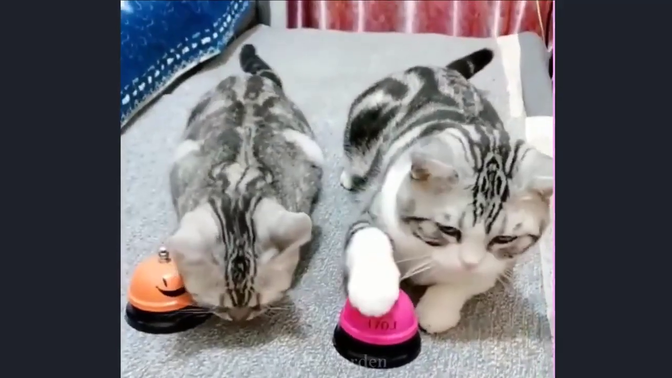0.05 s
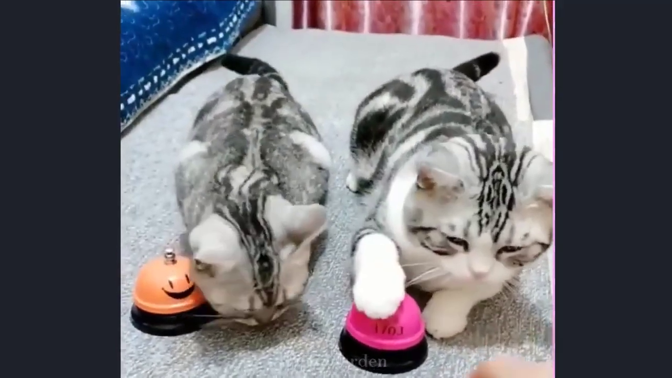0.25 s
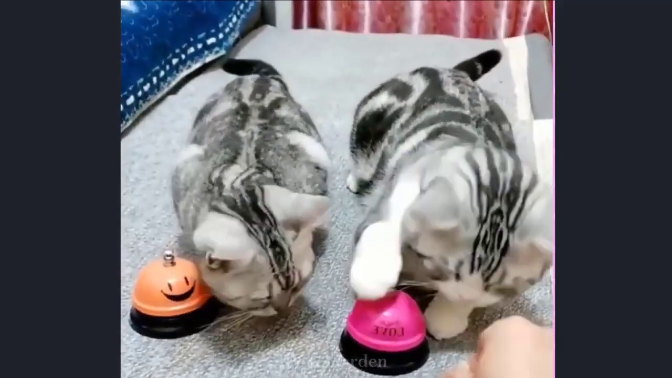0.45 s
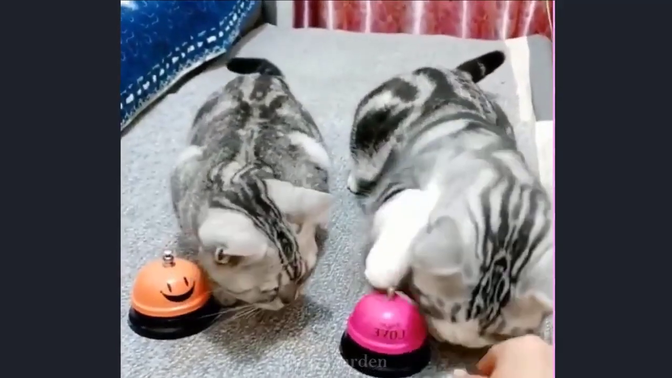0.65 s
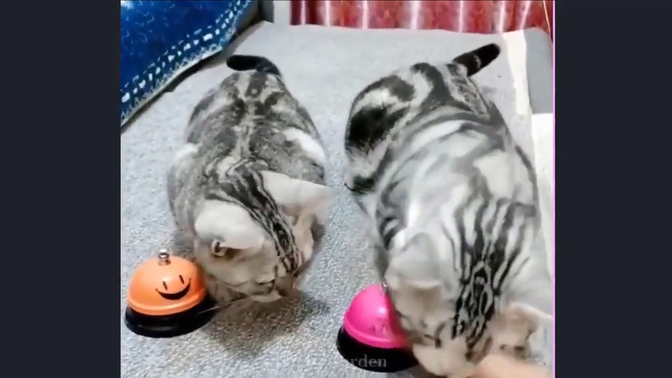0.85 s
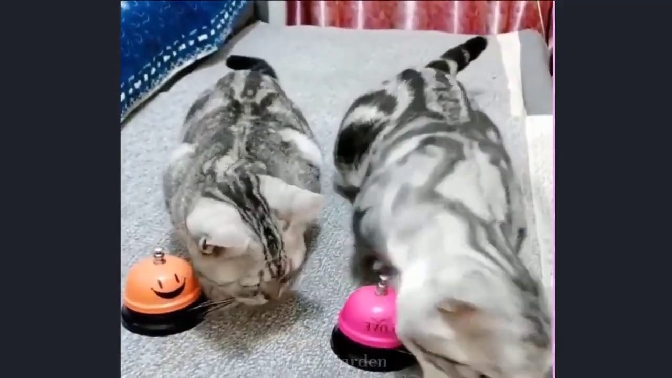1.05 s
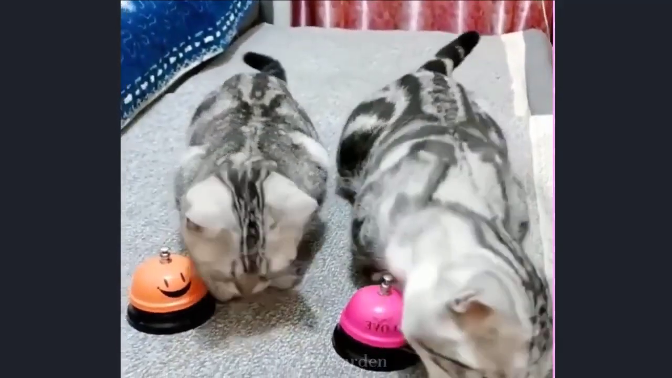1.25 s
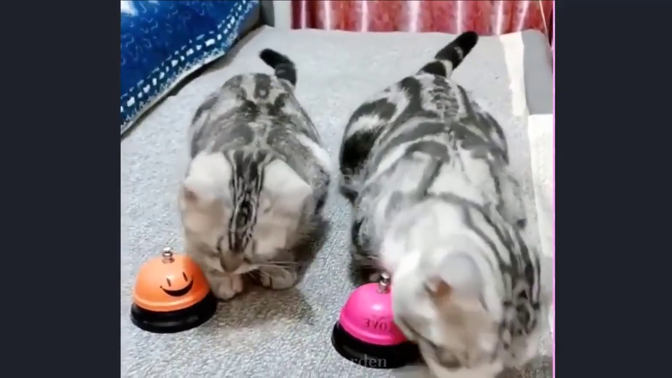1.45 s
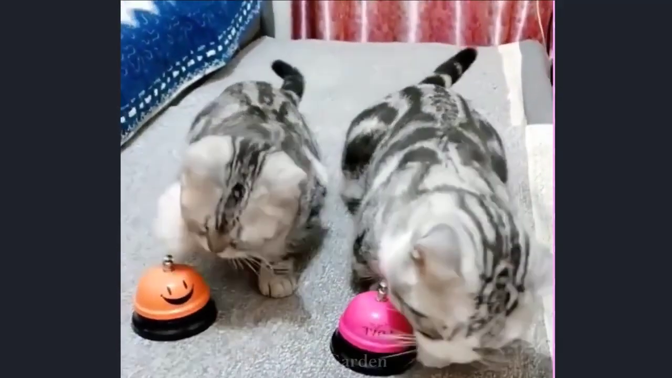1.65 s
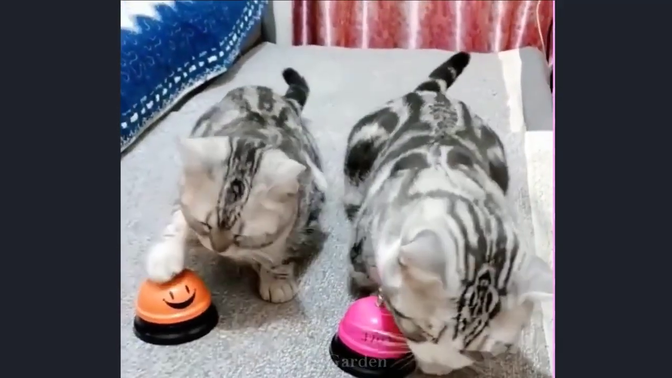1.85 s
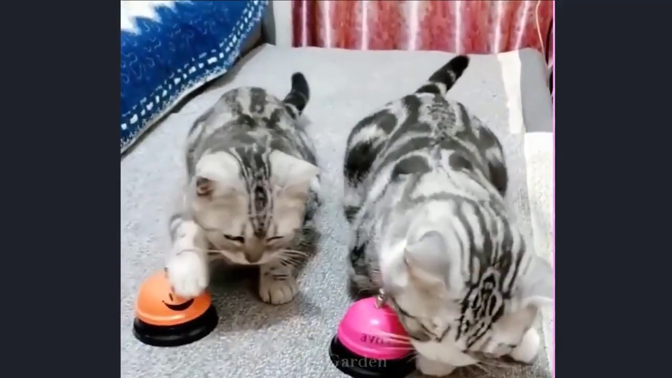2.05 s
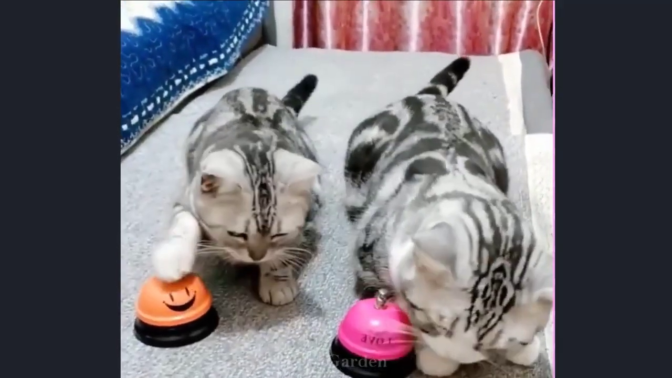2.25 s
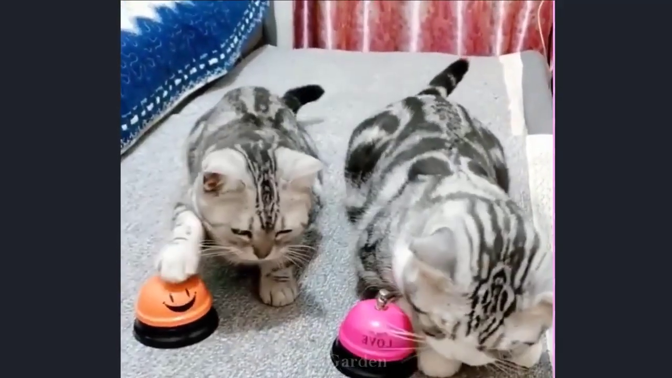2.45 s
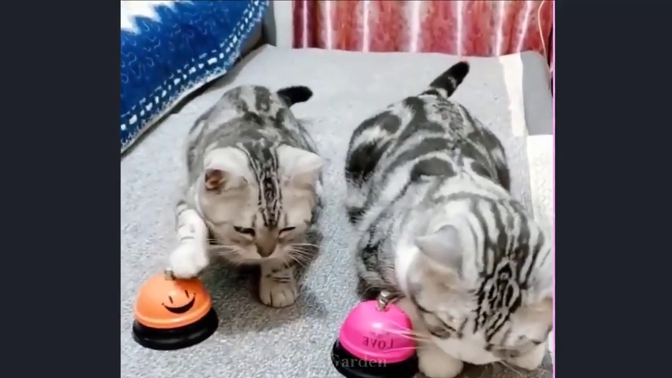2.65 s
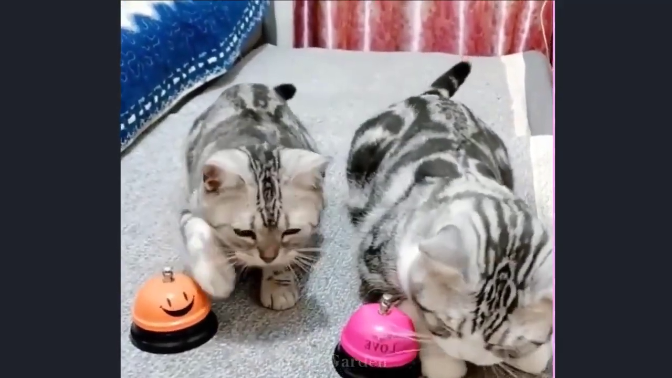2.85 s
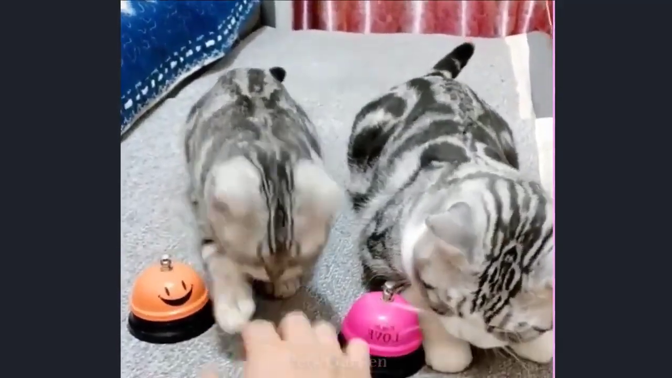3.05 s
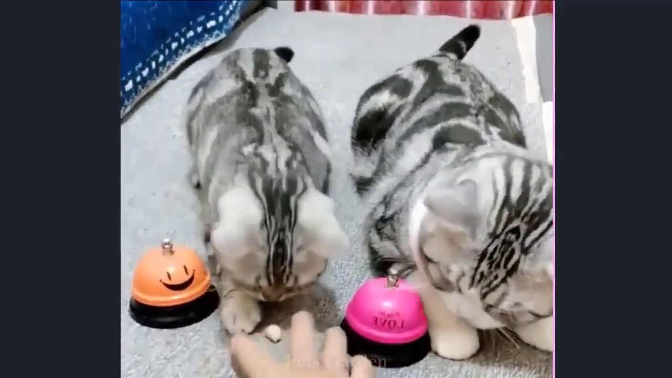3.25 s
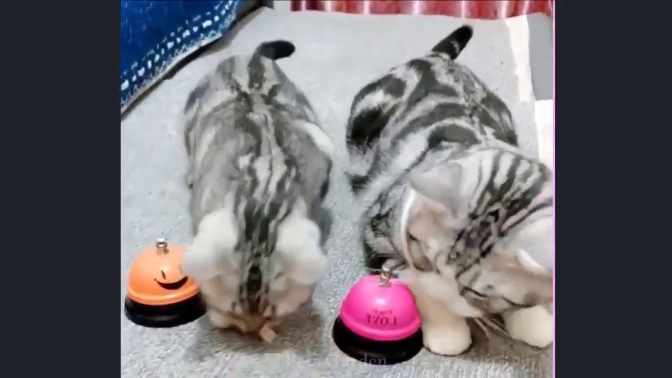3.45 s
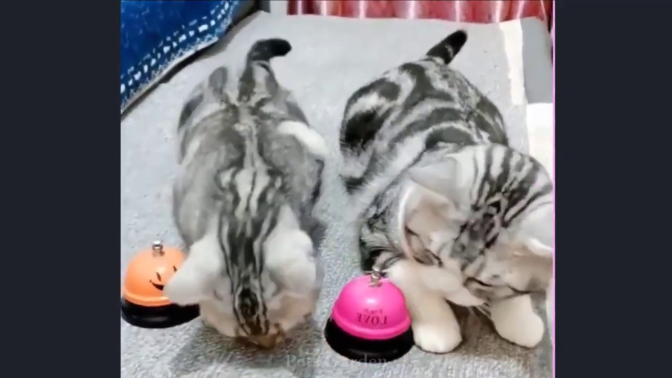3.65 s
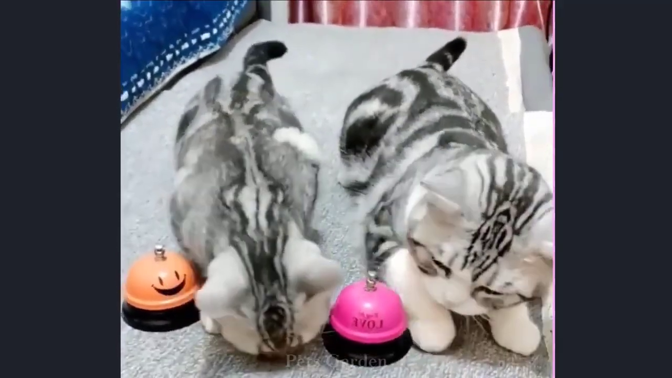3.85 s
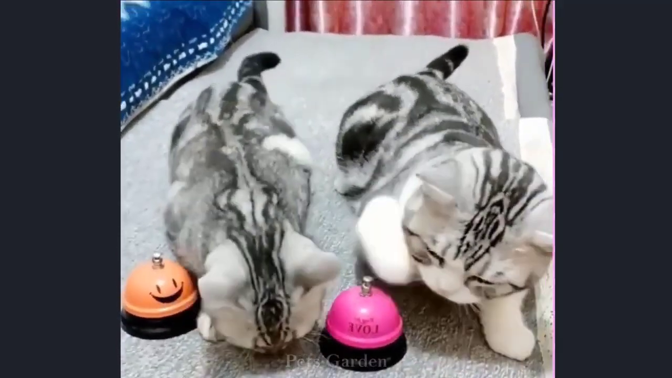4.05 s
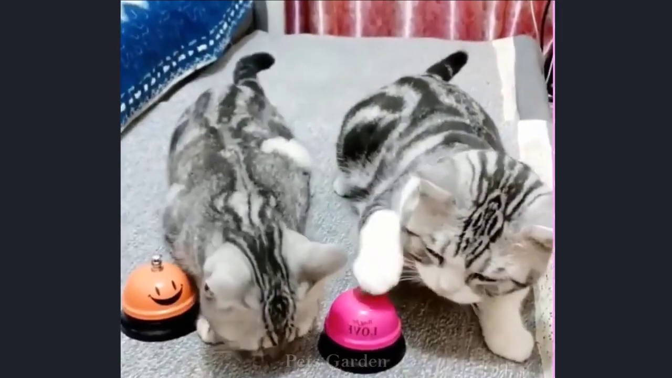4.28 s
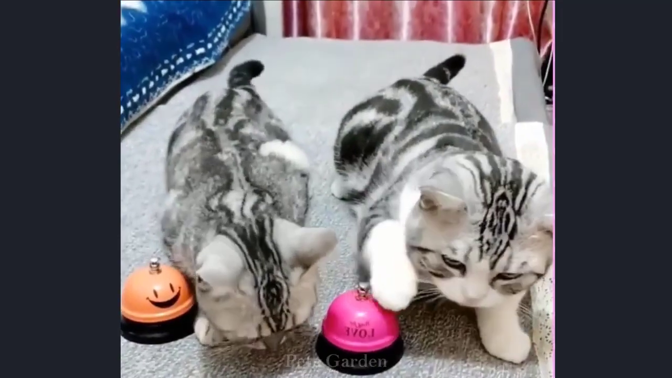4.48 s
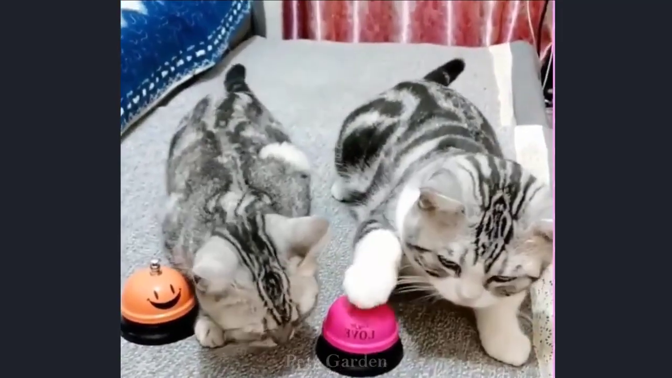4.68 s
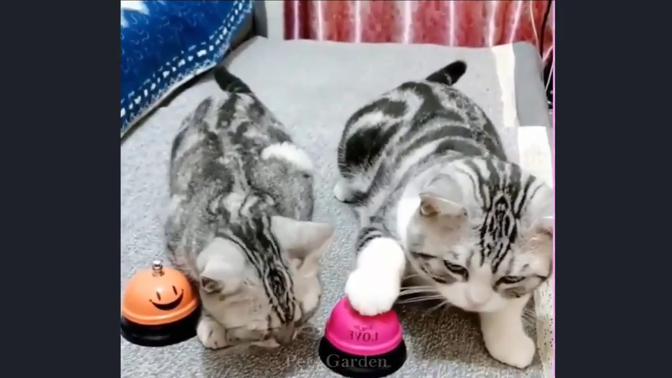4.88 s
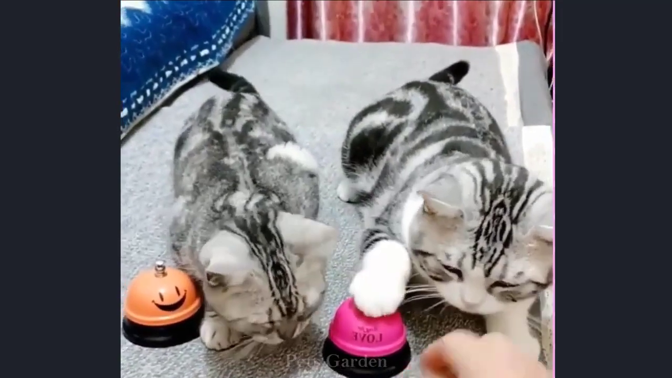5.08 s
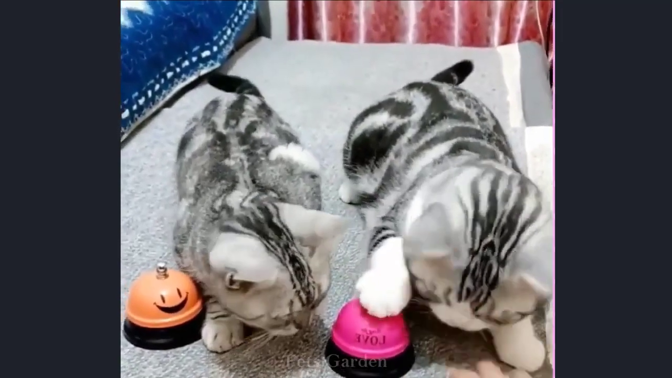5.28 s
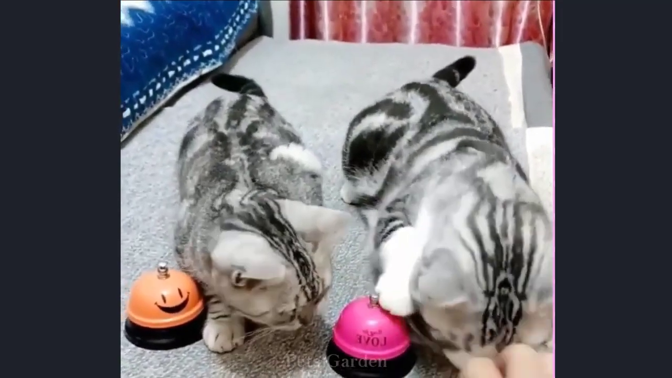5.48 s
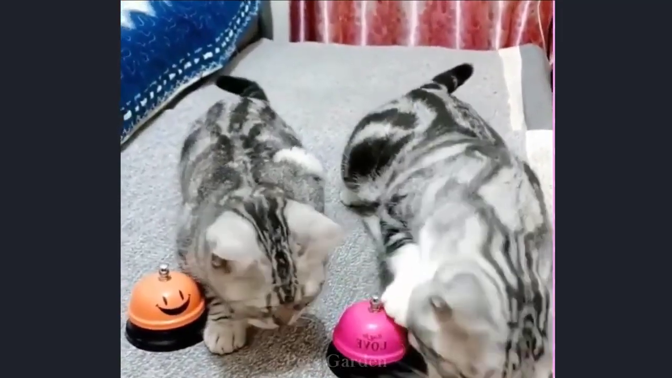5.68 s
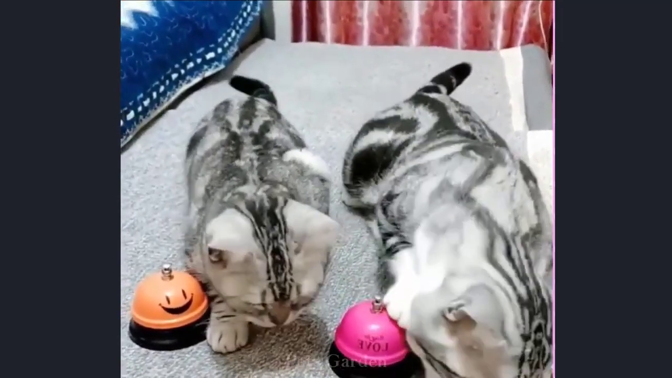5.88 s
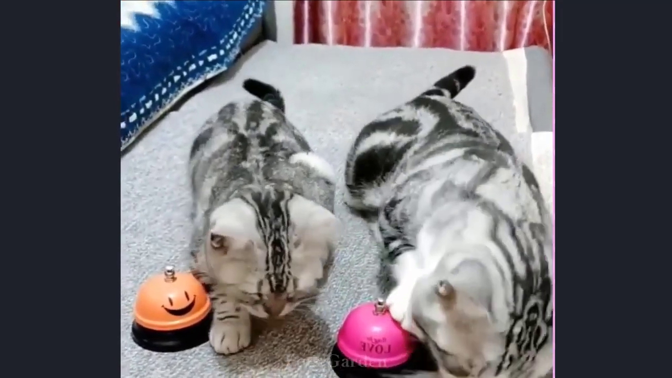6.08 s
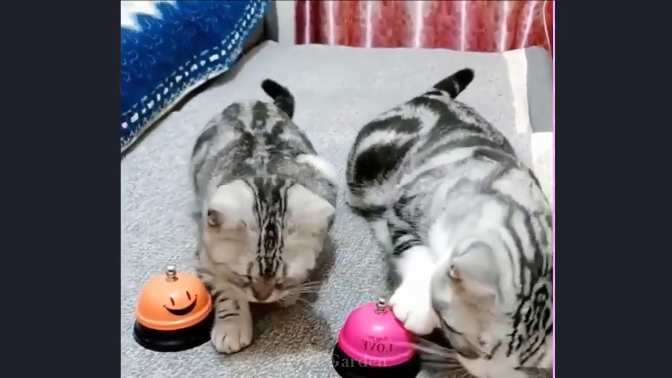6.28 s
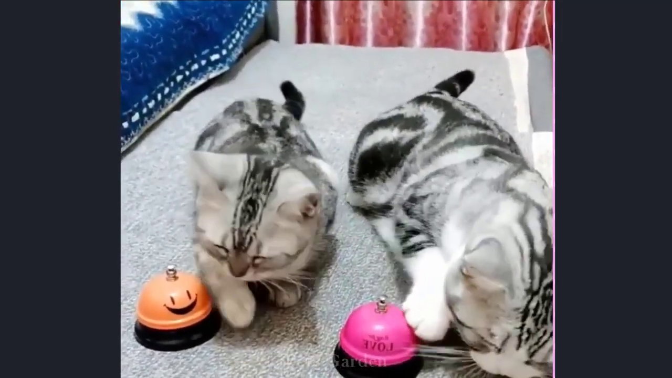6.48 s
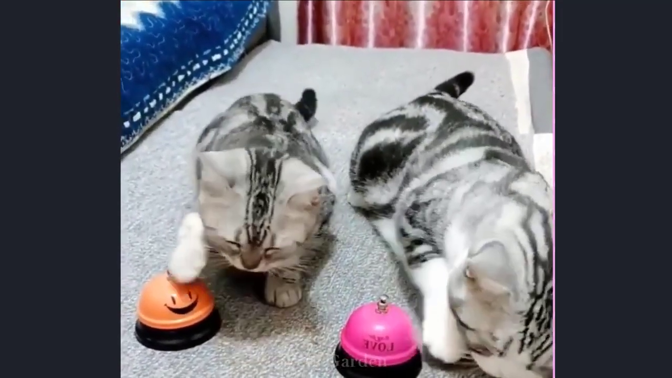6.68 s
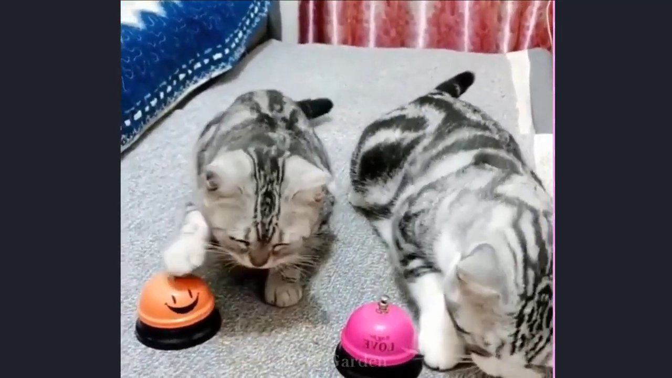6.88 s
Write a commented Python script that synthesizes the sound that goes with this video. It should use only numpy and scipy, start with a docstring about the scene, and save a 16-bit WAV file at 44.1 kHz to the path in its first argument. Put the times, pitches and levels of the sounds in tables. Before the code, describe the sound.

Two small desk bells on carpet are pawed by cats in turn. One bell dings twice in the first second, the other dings twice more softly around two seconds, then the first rings twice again after four. Plunger clicks, soft scuffs and fur swishes fall between. Close stereo microphone in a small quiet room with faint hiss and low rumble.

```python
"""Two small desk bells on a carpet ding in pairs as two cats take turns pawing them.
A plunger clicks, the clapper clashes on the dome, and paired sine waves make the ring; close pairs beat.
Between dings the cats rustle: shaped noise makes dragging paws and soft swishes of fur or plunger.
Behind lie room hiss, a low rumble, one spell of hum and a few booms.
A limiter holds the loud dings down and a filter cuts the highest treble."""
import sys
import numpy as np
from scipy import signal
from scipy.fft import rfft, irfft, next_fast_len
from scipy.io import wavfile
from scipy.ndimage import uniform_filter1d

SR = 44100
rng = np.random.default_rng(int(sys.argv[2]) if len(sys.argv) > 2 else 0)


def wav_record(signal):
    """Record a signal, one row per channel, as 16-bit PCM in the file named by sys.argv[1]."""
    frames = np.transpose(np.atleast_2d(signal))
    bounded = np.clip(frames, -1, 1)
    # unit amplitude maps onto the largest positive 16-bit level
    quanta = np.round(bounded * 32767).astype(np.int16)
    wavfile.write(sys.argv[1], SR, quanta)


N = 305613
TIME = np.arange(N) / SR  # seconds

# In all tables, T60 is the time to fade by 60 dB. Colours give only the relative strength of each pitch.

# The five partials of each dome. Each partial is paired with a second line:
# close pairs beat, wide pairs sound as two pitches.
# Each row: pitch in Hz, second line's pitch in Hz.
PINK_PITCHES = [(1164.7, 1134.7), (3066.2, 3071.1), (5657.6, 5680), (8785.7, 8714.6), (12575.2, 13237)]
ORANGE_PITCHES = [(1194.3, 1193.7), (3218.2, 3221.55), (5958, 5961), (9474.8, 8775), (12575.2, 10165)]
# How those pairs fade and sit in stereo. Each row: T60 in seconds, left over right in dB,
# lead of the left side in radians, second line's level against its partial in dB before each blow's shift,
# second line's left over right in dB.
PINK_MODES = [(3.5, 5.5, .5, 1.5, -6), (2.19, 7, 0.94, 2.5, 9.5), (0.93, 7, -1.1, 3, 13.5),
              (0.39, 6, -0.49, -22.5, 10.5), (0.24, 19.5, 0, -2, 3)]
ORANGE_MODES = [(4.15, 0, .6, -28, 23), (1.67, 17.5, 1, -14.5, 9), (.8, -5.5, -1.7, -31.5, 9),
                (0.33, 3, 0, -11.5, 10.5), (0.21, 14, 0, -30, 15.5)]
# Clapper blows. Each row: start in seconds, contact level in dB before the clash and fittings trims,
# five partial levels in dB, then shifts of the second lines in dB for partial 1, partials 2-3
# and partials 4-5.
PINK_STRIKES = [(0.2205, -15, -56, -41.5, -29.5, -6.5, -14, -2, -5.5, -30.5),
                (.842, -12.5, -57, -38, -34, -8, -17, 9, 1, -37),
                (4.385, -14.5, -59.5, -41.5, -29, -10.5, -42, 7.5, -20.5, 9),
                (4.934, -9, -55.5, -46, -33, -6.5, -17, -2.5, -8.5, -24.5)]
ORANGE_STRIKES = [(1.997, -21, -56, -38, -37, -17, -22.5, 0, 0, 0),
                  (2.483, -19, -53.5, -37, -47, -13, -25.5, 0, 0, -1)]
# A cat leans on the pink dome. Each row: start in seconds, length in seconds, loss in dB.
LEANS = [(1.135, 0.11, 17.5), (5.845, 0.092, 7)]
# The clapper grazes the ringing dome again.
# Each row: start in seconds, level in dB before the clash and fittings trims.
CLAPPER_GRAZES = [(1.012, -46), (4.487, -46.5), (4.51, -43), (4.547, -50), (4.582, -56)]
# Colours of the clash on the dome and of the grazed rim. Each row: pitch in Hz, strength in dB per Hz.
CLASH_COLOUR = [(300, -30), (2000, -29.5), (2800, -21.5), (3700, -40.5), (4300, -18.5), (7500, -16.5),
                (8050, 4), (9200, -7), (10200, -9), (11200, -27.5), (12100, -10.5), (13100, -1),
                (14000, -26.5), (16000, -31.5)]
RIM_COLOUR = [(1000, -32), (4400, -39), (7500, -38), (8200, 3.5), (9200, 5), (10200, -60), (15000, -67.5)]
# Short rings of clapper, post and rim. Each row: pitch in Hz, level against the contact in dB
# before random spread and trim, T60 in seconds.
SMALL_PARTS = [(4240, -50, 1), (6780, -18, 0.13), (8120, -7.5, 0.15), (8320, -8.5, 0.16), (8620, -13, 0.24),
               (10330, -12, 0.1), (10960, -14.5, 0.042), (12300, -8, 0.064), (12185, -11, 0.079)]

# Plunger clicks and taps on the bells.
# Each row: start in seconds, treble level in dB and body level in dB, both before the click trims.
PLUNGER_CLICKS = [(0.2048, -46.5, -59), (0.7876, -42, -64.5), (1.886, -64.5, -55), (1.958, -50.5, -57.5),
                  (2.2346, -56.5, -81), (2.446, -35, -48.5), (2.7635, -49, -66), (2.9573, -60, -58),
                  (4.3188, -33, -51), (4.579, -61.5, -57), (6.1345, -56.5, -73), (6.4768, -43.5, -54),
                  (6.5515, -44.5, -42.5)]
# Colours of the plunger's treble and the plastic base. Each row: pitch in Hz, strength in dB per Hz.
PLUNGER_COLOUR = [(2060, -35.5), (3500, -8.5), (3830, -21.5), (4370, -4.5), (6120, -10), (6740, -4),
                  (7370, -11.5), (8260, 4), (11400, -14), (14800, -18.5), (16000, -22.5)]
BASE_COLOUR = [(200, -19), (380, -5), (700, -4.5), (1200, -5.5), (1560, 6.5), (2050, -7.5), (2600, 5.5),
               (3600, -12.5), (5000, -39.5)]
# Claws and whiskers tick faintly on the bells; levels are before the click trims.
TICK_COUNT, TICK_TREBLE_DB, TICK_BODY_DB = 8, -64, -66

# A paw drags on the carpet. Each row: start in seconds, length in seconds, level in dB.
PAW_DRAGS = [(2.843, 0.14, -65), (3.744, 0.14, -61), (4.093, 0.09, -60), (6.158, 0.13, -64),
             (6.405, 0.24, -64)]
# Soft swishes: fur brushes past, or a paw rubs down the plunger before a blow.
# Each row: middle in seconds, length in seconds, peak level in dB.
SOFT_SWISHES = [(0.76, 0.28, -60), (1.56, 0.49, -65.5), (2.925, 0.21, -63.5), (3.3, 0.11, -70.5),
                (4.181, 0.2, -70.5), (4.921, 0.05, -56), (5.817, 0.12, -65), (6.252, 0.32, -66),
                (6.76, 0.62, -66.5)]
# Colours of paw on carpet and of the swishes. Each row: pitch in Hz, strength in dB per Hz.
PAW_COLOUR = [(80, -7.5), (260, 5), (720, -4), (1000, -9.5), (1600, -11.5), (2600, -29.5), (6000, -34)]
SWISH_COLOUR = [(200, 1.5), (2800, -1), (3700, -7.5), (4400, -3.5), (7400, -3), (8400, 3.5), (11500, -11),
                (15000, -18), (16000, -36)]
PAW_ATTACK_S, PAW_T60_S = 0.013, 0.9
# The cats are never quite still: these faint rustles last throughout.
RESTLESS_PAW_DB, RESTLESS_SWISH_DB = -71, -72.5
FLOOR_RUMBLE_DB = 3  # the floor rumbles under a dragging paw, this much above the scuff

# Deep rumble over time. Each row: time in seconds, level in dB before its trim.
RUMBLE_LEVEL = [(0.0, -66.5), (0.5, -62), (0.87, -69), (4.17, -53), (5.0, -64), (5.29, -58), (6.93, -73)]
# The one long spell of hum. Each row: time in seconds, level in dB before its trim and swell.
HUM_LEVEL = [(0.8, -65.5), (0.948, -51.5), (1.484, -64), (2.226, -51.5), (2.452, -55), (2.53, -71.5)]
RUMBLE_TRIM_DB, HUM_TRIM_DB, HUM_HZ = 2.5, 0.5, 58.6
# Brief low booms. Each row: start in seconds, length in seconds, pitch in Hz, level in dB before its swell.
LOW_BOOMS = [(3.52, 0.48, 65.2, -58), (4.123, 0.08, 66, -51.5), (6.832, 0.1, 71.2, -53.5)]
LOW_ATTACK_S, LOW_T60_S = 0.04, 0.5  # for both hum and booms
# Colours of the rumble and the room hiss. Each row: pitch in Hz, strength in dB per Hz.
LOW_COLOUR = [(12, -17), (30, 3.5), (48, -23), (110, -15.5), (220, -29), (500, -72.5)]
ROOM_COLOUR = [(12, -39), (20, -8), (68, -4), (187, -19), (248, -19), (277, -23.5), (337, -15.5),
               (542, -36.5), (590, -41.5), (1220, -27.5), (1440, -36), (8650, -48), (14700, -46.5),
               (16000, -64.5)]
ROOM_DB = -63

# How alike left and right noise are. Each row: pitch in Hz, likeness from 0 (unrelated) to 1 (identical).
STEREO_LIKENESS = [(60, 0.99), (130, 0.96), (260, 1), (520, 0.19), (2000, 0.029), (8500, 0.17), (13000, .2)]
# Stereo balance of the noises and small parts. Each row: pitch in Hz, left over right in dB.
STEREO_BALANCE = [(1200, 0), (3000, 0), (5000, 0), (10800, 4), (12300, 5.5)]
SIDES = np.array([[1], [-1]])  # left, right


def bell(pitches, modes, blows, rise_s):
    """Each blow starts the dome's ring afresh and sets the balance in each pair, so how deep close pairs beat."""
    out = np.zeros((2, N))
    ends = [blow[0] for blow in blows[1:]] + [N / SR + 1]
    for (start, _, *levels, low, middle, high), end in zip(blows, ends):
        stop = min(end, start + 2) + np.pi / 10
        span = slice(int(start * SR), int(stop * SR))
        age = TIME[span] - TIME[span][0]
        rise = 1 - np.exp(-age / rise_s)
        # the old ring dies quickly once the next blow lands
        gate = rise * np.exp(-np.maximum(TIME[span] - end, 0) / rise_s)
        shifts = (low, middle, middle, high, high)
        for (hz, second_hz), mode, db, shift_db in zip(pitches, modes, levels, shifts):
            t60, left_db, lead, second_db, second_left_db = mode
            main = partial(age, hz, left_db, lead)
            second = from_db(second_db + shift_db) * partial(age, second_hz, second_left_db, 0)
            out[:, span] += from_db(db) * fade(age, t60) * gate * (main - second)
    return out


def partial(age, hz, left_db, lead):
    """One line of a metal part is a sine wave, with its own loudness and timing at the two microphones."""
    return pan(left_db) * np.sin(2 * np.pi * hz * age + lead * SIDES / 2)


def leaning():
    """Fur on the pink dome drains its ring until the next blow."""
    lost_db = np.zeros(N)
    for start, length, db in LEANS:
        later_blows = [blow[0] for blow in PINK_STRIKES if blow[0] > start]
        next_blow = min(later_blows + [N / SR])
        lost_db += db * np.clip((TIME - start) / length, 0, 1) * (TIME < next_blow)
    return from_db(-lost_db)


def clashes(crack_t60, tail_t60, tail_db, rise_s, grain_db):
    """The steel clapper makes a sharp crack, then a grainy shimmer that dies in the room; a graze only buzzes."""
    level = np.zeros(N)
    for start, db, *_ in PINK_STRIKES + ORANGE_STRIKES:
        crack = burst(start, crack_t60, rise_s)
        tail = from_db(tail_db) * burst(start, tail_t60, rise_s)
        level += from_db(db) * (crack + tail)
    buzz = sum(from_db(db) * burst(start, t60=0.24, rise_s=0.0032) for start, db in CLAPPER_GRAZES)
    grain = lumps(300, grain_db)
    clash = noise(CLASH_COLOUR, level * grain, ripple_db=5, ripple_hz=88.24)
    return clash + noise(RIM_COLOUR, buzz * grain)


def fittings(rise_s, spread_db):
    """Every clapper contact also rings the small metal parts, each with a random strength of its own."""
    out = np.zeros((2, N))
    for start, db, *_ in PINK_STRIKES + ORANGE_STRIKES + CLAPPER_GRAZES:
        span = slice(int(start * SR), int(start * SR) + SR)
        age = TIME[span] - TIME[span][0]
        rise = 1 - np.exp(-age / rise_s)
        draws = rng.standard_normal((len(SMALL_PARTS), 2))
        for (hz, mode_db, t60), (luck, lead) in zip(SMALL_PARTS, draws):
            level = from_db(db + mode_db + spread_db * luck) * fade(age, t60) * rise
            out[:, span] += level * partial(age, hz, at_hz(STEREO_BALANCE, hz), lead)
    return out


def clicks(treble_db, body_db, t60, rise_s, room_db, room_t60, grain_db):
    """The plunger rattles in its sleeve and knocks the plastic base: two noises, each with a room tail."""
    treble, body = np.zeros(N), np.zeros(N)
    for start, high_db, low_db in PLUNGER_CLICKS + ticks():
        room_tail = from_db(room_db) * burst(start, room_t60, rise_s)
        shape = burst(start, t60, rise_s) + room_tail
        treble += from_db(high_db + treble_db) * shape
        body += from_db(low_db + body_db) * shape
    grain = lumps(400, grain_db)
    rattle = noise(PLUNGER_COLOUR, treble * grain, ripple_db=8, ripple_hz=169.9)
    return rattle + noise(BASE_COLOUR, body * grain)


def ticks():
    """Claws and whiskers touch the bells at random moments, giving rows like those of the clicks."""
    times = rng.uniform(0, N / SR, size=TICK_COUNT)
    return [(start, TICK_TREBLE_DB, TICK_BODY_DB) for start in times]


def cats():
    """Paws drag on the carpet and shake the floor; fur, or a paw on the plunger, swishes softly."""
    drag = sum(from_db(db) * stroke(start, length, PAW_ATTACK_S, PAW_T60_S)
               for start, length, db in PAW_DRAGS)
    swish = sum(from_db(db) * np.exp(-2 * ((TIME - middle) / length) ** 2)
                for middle, length, db in SOFT_SWISHES)
    # hypot adds the steady rustle by power
    drag_level = np.hypot(drag, from_db(RESTLESS_PAW_DB)) * lumps(30, depth_db=2.0)
    swish_level = np.hypot(swish * lumps(97, depth_db=2.5), from_db(RESTLESS_SWISH_DB))
    scuffs = noise(PAW_COLOUR, drag_level, ripple_db=4, ripple_hz=50.1)
    swishes = noise(SWISH_COLOUR, swish_level)
    floor = noise(LOW_COLOUR, from_db(FLOOR_RUMBLE_DB) * drag)
    return scuffs + swishes + floor


def background():
    """Coloured noise makes the rumble and room hiss; low sine waves make a spell of hum and a few booms."""
    rumble = noise(LOW_COLOUR, from_db(in_time(RUMBLE_LEVEL) + RUMBLE_TRIM_DB))
    start, end = HUM_LEVEL[0][0], HUM_LEVEL[-1][0]
    spell = stroke(start, end - start, LOW_ATTACK_S, LOW_T60_S)
    hum_level = from_db(in_time(HUM_LEVEL) + HUM_TRIM_DB) * spell
    hum = hum_level * np.sin(2 * np.pi * HUM_HZ * TIME)
    booms = np.zeros(N)
    for start, length, hz, db in LOW_BOOMS:
        swell = from_db(db) * stroke(start, length, LOW_ATTACK_S, LOW_T60_S)
        booms += swell * np.sin(2 * np.pi * hz * TIME)
    # a sine's rms is its peak over the square root of 2
    return rumble + np.sqrt(2) * (hum + booms) + noise(ROOM_COLOUR, from_db(ROOM_DB))


def noise(spectrum, level, ripple_db=0, ripple_hz=120):
    """Filters random noise of a given rms level into a colour, with left and right as alike as the table says."""
    size = next_fast_len(N + SR // 10)
    hz = np.fft.rfftfreq(size, 1 / SR)
    mid, side = rfft(rng.standard_normal((2, N)) * level, size)
    alike = np.clip(at_hz(STEREO_LIKENESS, hz), -1, 1)
    both = np.sqrt(1 + alike) * mid + np.sqrt(1 - alike) * side * SIDES
    # many small resonances, about ripple_hz apart, roughen the colour
    bumps = rng.standard_normal(size=2048)
    ripple = ripple_db * np.interp(hz / ripple_hz, np.arange(2048), bumps)
    balance = SIDES * at_hz(STEREO_BALANCE, hz) / 2
    colour = from_db(at_hz(spectrum, hz) + ripple + balance)
    colour /= np.sqrt(2 * np.mean(colour ** 2))
    # minimum phase: the resonances ring after a hit, never before it
    cepstrum = irfft(np.log(colour), size)[:, :size // 2]
    cepstrum[:, 1:] *= 2
    return irfft(both * np.exp(rfft(cepstrum, size)), size)[:, :N]


def burst(start, t60, rise_s):
    """A hit swells quickly, then dies away exponentially."""
    age = TIME - start
    return fade(age, t60) * (1 - np.exp(-np.maximum(age, 0) / rise_s))


def stroke(start, length, attack_s, t60):
    """A longer movement swells, holds for the given length, then dies away."""
    age = np.maximum(TIME - start, 0)
    return (1 - np.exp(-age / attack_s)) * fade(np.maximum(age - length, 0), t60)


def lumps(per_s, depth_db):
    """A gain that wanders at random, as in uneven contact."""
    steps = rng.standard_normal(size=8192)
    return from_db(depth_db * np.interp(TIME * per_s, np.arange(len(steps)), steps))


def fade(age, t60):
    """Exponential decay that starts at age zero and loses 60 dB every t60 seconds."""
    return (age >= 0) * np.exp(-np.log(1000) * np.clip(age / t60, 0, 10))


def pan(left_db):
    """Left and right gains of constant power."""
    gains = from_db(left_db * SIDES / 2)
    return gains / np.sqrt(np.mean(gains ** 2))


def at_hz(points, hz):
    """Reads a table at any pitch, on a log-frequency axis."""
    pitch, value = np.transpose(points)
    return np.interp(np.log(hz + 1), np.log(pitch), value)


def in_time(rows):
    """Reads a table of time and level at every sample."""
    seconds, level = np.transpose(rows)
    return np.interp(TIME, seconds, level)


def from_db(db):
    """Turns decibels into gain."""
    return 10 ** (np.asarray(db) / 20)


def limiter(x, threshold_db, share, release_db_per_s, attack_s):
    """The gain ducks quickly when the sound is loud and creeps back as it fades."""
    power = uniform_filter1d(np.mean(x ** 2, axis=0), size=128)  # averaged over about 3 ms
    level_db = 10 * np.log10(np.maximum(power, 1e-12))
    # share is the part of the excess that is taken away
    over_db = np.maximum(level_db - threshold_db, 0) * np.clip(share, 0, 1)
    release_db = release_db_per_s * TIME
    held_db = np.maximum.accumulate(over_db + release_db) - release_db
    keep = np.exp(-1 / (attack_s * SR))
    smooth_db = signal.lfilter([1 - keep], [1, -keep], held_db)
    return x * from_db(-smooth_db)


def scene():
    """Adds both bells, their clatter, the cats and the room."""
    pink = bell(PINK_PITCHES, PINK_MODES, PINK_STRIKES, rise_s=0.0015) * leaning()
    orange = bell(ORANGE_PITCHES, ORANGE_MODES, ORANGE_STRIKES, rise_s=0.0082)
    clatter = clashes(crack_t60=0.06, tail_t60=0.18, tail_db=-4.5, rise_s=0.0044, grain_db=1.0)
    jingle = fittings(rise_s=0.0018, spread_db=2.0)
    plungers = clicks(treble_db=6.5, body_db=2.0, t60=0.05, rise_s=0.0027,
                      room_db=-16.5, room_t60=0.3, grain_db=1)
    # the clash and fittings trims
    contacts = from_db(0.5) * clatter + from_db(-3) * jingle
    return pink + orange + contacts + plungers + cats() + background()


def record(dry):
    """A limiter holds the loud dings down, then a steep low-pass filter cuts the highest treble."""
    held = limiter(dry, threshold_db=-22, share=0.8, release_db_per_s=94.5, attack_s=0.0008)
    # at least 70 dB down from 16700 Hz up
    low_pass = signal.cheby2(14, 70, 16700, fs=SR, output="sos")
    return signal.sosfilt(low_pass, held)


dry = scene()
out = record(dry)
wav_record(out)
```